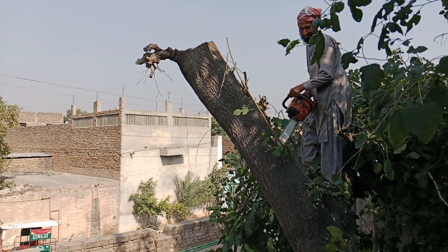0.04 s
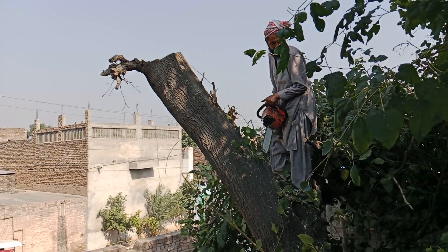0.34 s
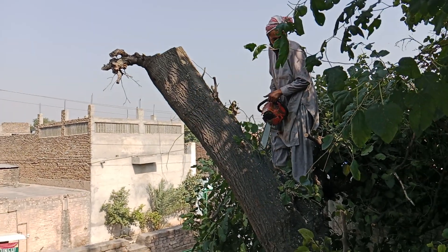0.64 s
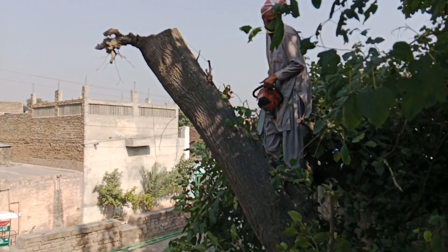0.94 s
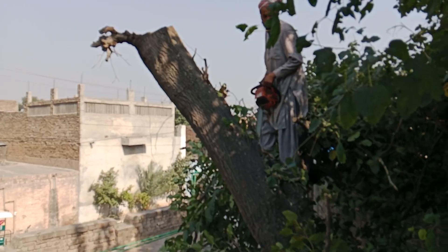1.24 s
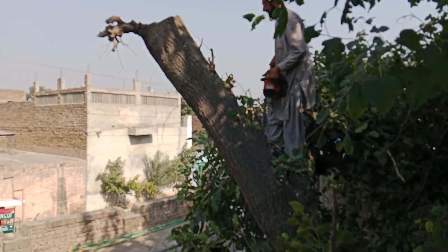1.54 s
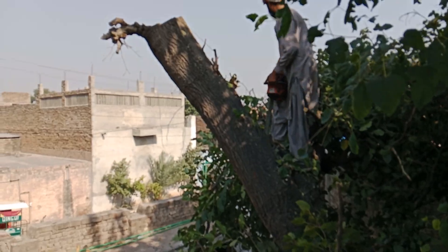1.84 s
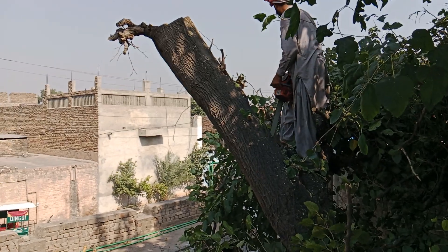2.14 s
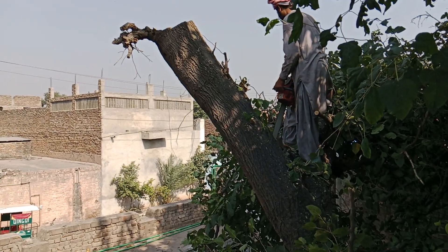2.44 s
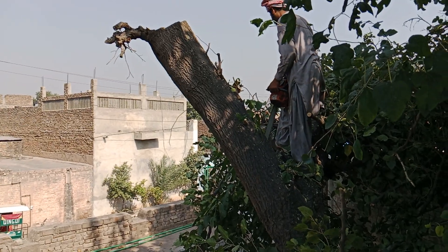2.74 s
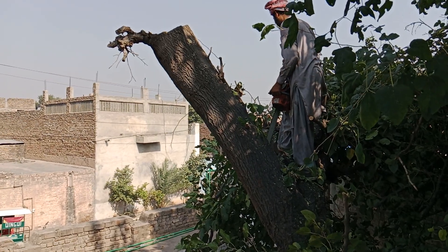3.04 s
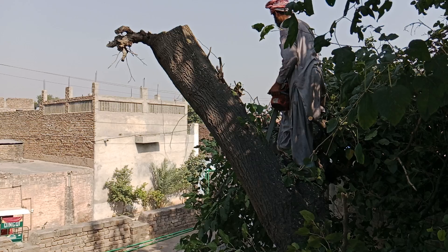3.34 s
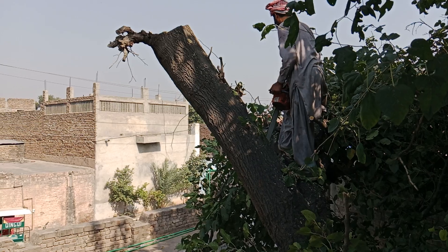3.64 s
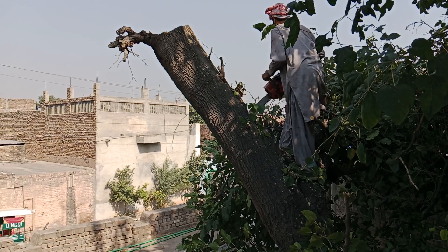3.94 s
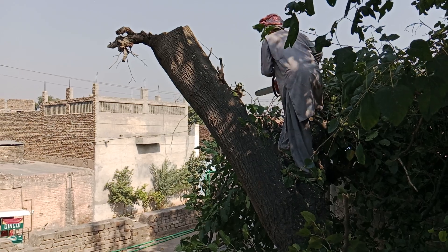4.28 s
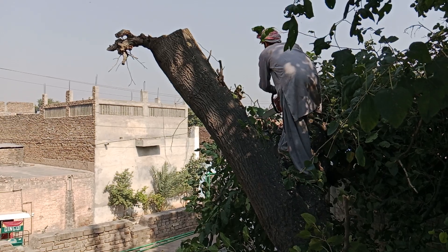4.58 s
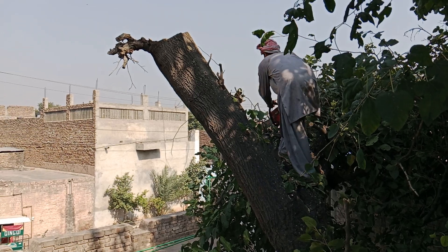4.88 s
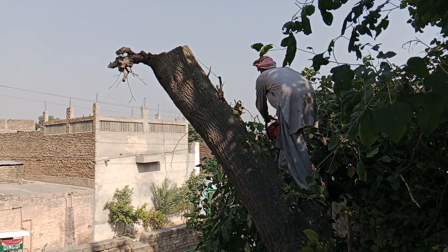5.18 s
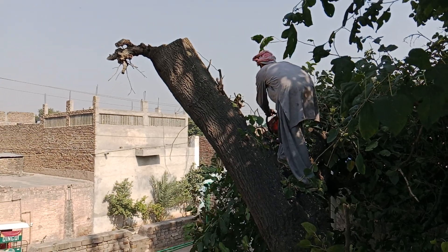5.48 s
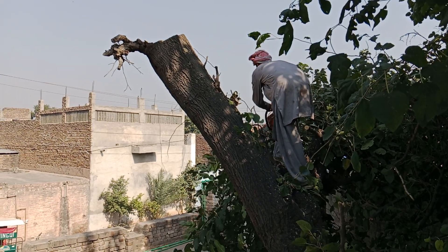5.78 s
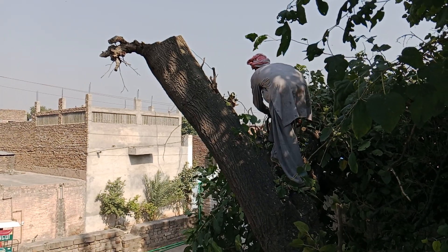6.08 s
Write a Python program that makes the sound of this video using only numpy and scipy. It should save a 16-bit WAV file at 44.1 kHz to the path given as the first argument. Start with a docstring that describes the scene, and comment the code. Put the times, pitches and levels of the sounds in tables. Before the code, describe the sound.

A two-stroke chainsaw is running at high revs outdoors and immediately winds down, its howl, rasp and chain rattle fading as the pitch falls. By about 1.2 seconds it reaches a low, popping idle, with a very faint knock and a few tiny metal tinkles around 1.3 to 1.6 seconds. The idle wavers and misfires, with light metallic ticking underneath. From about 3.2 to 4.2 seconds it grows fuller and throatier, with more short reflection from nearby walls; two faint twig knocks come near 3.7 and 3.9 seconds. At 4.6 seconds the throttle opens and the engine climbs to a loud, booming howl with a sizzling, rattling chain, peaking near 5.1 seconds. The revs sag without reaching idle, jump briefly at 5.5 seconds, sag again, and rise a third time from 6.1 seconds to the end. A faint airy rumble lies beneath.

```python
"""A two-stroke chainsaw winds down from high revs, howling and rattling its chain, in a tree over a walled
yard. It settles to a misfiring idle, swings round, and is blipped three times. Every stroke pops through
the muffler; at speed the pops fuse into a boom and a howl, and an open throttle swells a low drone, a
bark, a sputter and a gas rasp. The chain sizzles on the bar, the piston ticks, the clutch drum rings,
a loose link tinkles, twigs knock, and the walls answer the exhaust."""
import sys
import numpy as np
from scipy import signal
from scipy.fft import rfft, irfft, next_fast_len
from scipy.io import wavfile
from scipy.ndimage import uniform_filter1d, minimum_filter1d, map_coordinates

SR = 44100
rng = np.random.default_rng(int(sys.argv[2]) if len(sys.argv) > 2 else 0)


def digitize_waveform(pressure):
    """Quantize a signal to 16-bit integers and store it at the path in sys.argv[1].

    Rows of a 2-D input are taken as channels; values are limited to [-1, 1].
    """
    field = np.atleast_2d(pressure).T
    bounded = np.clip(field, -1, 1)
    quanta = np.round(bounded * 32767).astype(np.int16)
    wavfile.write(sys.argv[1], SR, quanta)


N = 278345
TIME_S = np.arange(N) / SR


def amp(db):
    """Decibels to gain."""
    return 10 ** (np.asarray(db) / 20)


def curves(rows):
    """An automation curve for each column after the time."""
    times, *columns = np.transpose(rows)
    return [np.interp(TIME_S, times, column) for column in columns]


def along(points, hz):
    """Read (freq_hz, value) points on a log frequency axis."""
    freqs, values = np.transpose(points)
    return np.interp(np.log(hz + 1), np.log(freqs + 1), values)


def steady(x, size=4400):
    """Ride x to a running rms of 1."""
    power = uniform_filter1d(uniform_filter1d(x * x, size), size // 2)
    return x / np.sqrt(np.abs(power) + 1e-20)


def wobble(rate_hz):
    """A smooth random modulator."""
    knots = rng.standard_normal(int(N * rate_hz / SR) + 4)
    return map_coordinates(knots, [np.arange(N) * rate_hz / SR])


def lagged(x, seconds):
    """Follow x with a first-order lag."""
    keep = np.exp(-1 / (seconds * SR))
    return x[0] + signal.lfilter([1 - keep], [1, -keep], x - x[0])


def pulses(times, sizes):
    """Impulses placed between samples."""
    at = np.clip(times * SR, 0, N)
    i = at.astype(int)
    return (np.bincount(i, sizes * (1 - at + i), N + 2) + np.bincount(i + 1, sizes * (at - i), N + 2))[:N]


def gated(turns, start, sharpness, leak):
    """Noise that bursts once a turn and dies away, over a constant leak."""
    return rng.standard_normal(N) * (leak + np.exp(-sharpness * ((turns - start) % 1)))


def colour(x, spectrum, lean=1, size=8192):
    """EQ x; at lean 1 a pulse starts abruptly, at 0 it swells as it fades."""
    cepstrum = irfft(np.log(amp(along(spectrum, np.fft.rfftfreq(size, 1 / SR)))))
    cepstrum[1:size // 2] *= 1 + lean
    cepstrum[size // 2 + 1:] *= 1 - lean
    response = np.fft.fftshift(irfft(np.exp(rfft(cepstrum))))
    return signal.fftconvolve(x, response)[size // 2:][:N]


def ring(x, modes):
    """Play x through damped resonances."""
    t = np.arange(SR // 10) / SR
    body = sum(amp(db) * width * np.exp(-np.pi * width * t) * np.sin(2 * np.pi * hz * t)
               for hz, width, db in modes)
    return signal.fftconvolve(x, body / np.abs(body).max())[:N]


def shimmer(x, depth_db):
    """Narrow bands of x swell and fade at random."""
    bands = signal.stft(x, nperseg=1024)[2]
    field = uniform_filter1d(rng.standard_normal(bands.shape), 3, axis=0)
    field = uniform_filter1d(field, 9, axis=1)
    return signal.istft(bands * amp(depth_db * field / field.std()), nperseg=1024)[1][:N]


def scattered(x, decay_s):
    """Smear x with many tiny, dying reflections."""
    t = np.arange(SR // 40) / SR
    return signal.fftconvolve(x, rng.standard_normal(len(t)) * np.exp(-t / decay_s))[:N]


IDLE_HZ, FREE_HZ = 42, 229.5  # stroke rates: ticking over, and running free at open throttle
# the hunting idle: time_s, stroke_rate_hz
IDLE_SPEED = [(1.15, 46.69), (1.3, 40.51), (1.45, 42.59), (1.87, 38.97), (2.2, 42.9), (2.55, 41.62),
              (2.7, 40.0), (2.87, 42.13), (3.15, 42.18), (3.4, 44.22), (3.55, 43.65), (3.72, 45.86),
              (4.02, 41.91), (4.25, 45.6), (4.52, 46.75)]
# throttle blips: open_s, shut_s, pull_per_s, drag_per_s, opening_fraction
BLIPS = [(4.563, 5.13, 2.36, 1.76, 0.94), (5.549, 5.698, 2.84, 1.181, 0.8),
         (6.077, 6.318, 2.553, 1.2, 0.72)]
def crank(start_hz=147.44, coast_drag_per_s=1.0956):
    """Strokes per second: a coast to idle, then each blip pulls toward free speed and drag takes over."""
    coast = start_hz * np.exp(-coast_drag_per_s * TIME_S)
    speed = np.maximum(coast, curves(IDLE_SPEED)[0])
    for start, shut, pull, drag, _ in BLIPS:
        headroom_hz = FREE_HZ - np.interp(start, TIME_S, speed)
        rise = FREE_HZ - headroom_hz * np.exp(-pull * np.clip(TIME_S - start, 0, shut - start))
        fall = np.exp(-drag * np.maximum(TIME_S - shut, 0))
        speed = np.where(TIME_S > start, rise * fall, speed)
    return uniform_filter1d(speed, 2000)


def gas(attack_s=0.008, release_s=0.054, lead_s=0.0024):
    """Throttle envelope, 0-1: each blip opens just ahead of the crank, holds and releases."""
    t = TIME_S + lead_s
    return sum(opening * (1 - np.exp(-np.maximum(t - start, 0) / attack_s))
               * np.exp(-np.maximum(t - shut, 0) / release_s)
               for start, shut, _, _, opening in BLIPS)


def turned(start_s=3.236, length_s=1):
    """How far the saw has swung round, 0-1."""
    return np.clip((TIME_S - start_s) / length_s, 0, 1)


def loudness(speed, idle_db, speed_db, knee, bend, gas_db, turned_db):
    """A layer's fader, set by a LAW table: its idle level, moved by speed, throttle and facing."""
    revs = np.maximum(speed - IDLE_HZ, 0) / (FREE_HZ - IDLE_HZ)
    # knee: share of the rev range that brings most of the rise; bend: how late the rise sets in
    rise = 1 - np.exp(-(revs / knee) ** bend)
    return amp(idle_db + speed_db * rise + gas_db * gas() + turned_db * turned())


# strokes that fail to fire at idle: time_s
MISFIRES = [1.58, 1.63, 1.88, 2.03, 2.18, 2.22, 2.27, 2.39, 2.46, 2.53, 2.58, 2.65, 2.77, 2.82, 2.87, 2.92,
            2.99, 3.04, 3.11, 3.2, 3.25, 3.34, 3.39, 3.43, 3.5, 3.57, 3.66, 3.7, 3.77, 3.82, 3.88, 3.95,
            4.0, 4.09, 4.14, 4.2, 4.47]
def strokes(speed, turns, coast_end_s=1.511, idle_below_hz=51, misfire_db=-6):
    """Time and burn strength of each stroke; the timing is loosest at idle and from the first blip on."""
    times = np.interp(np.arange(1, turns[-1]), turns, TIME_S)
    rate = np.interp(times, TIME_S, speed)
    burn_dice, timing_dice = rng.standard_normal((len(times), 2)).T
    nearest = lambda s: np.argmin(np.abs(times - s))
    # late in the coast only every third stroke fires
    to_idle = nearest(coast_end_s) - np.arange(len(times))
    misfired = (to_idle > -2) & (to_idle % 3 != 0)
    misfired[[nearest(s) for s in MISFIRES]] = True
    burn_db = np.where(rate < idle_below_hz, 1.73 * burn_dice + misfire_db * misfired, -0.74 * burn_dice)
    jitter_turns = np.where(times > BLIPS[0][0], .011, .004 + .013 * (rate.min() / rate) ** 2)
    return times + jitter_turns * timing_dice / rate, burn_db


# the yard's reverb: freq_hz, t60_s
YARD_DECAY = [(100, .22), (380, .28), (900, .25), (3000, .17), (12000, .1)]
def yard(x, wet_db=-12, turned_db=10):
    """Direct sound plus the walls' short diffuse answer, wetter when the saw faces away."""
    hz, age, bands = signal.stft(rng.standard_normal(SR // 3), SR, nperseg=256)
    decay = amp(-60 * age / along(YARD_DECAY, hz)[:, None])
    tail = signal.istft(bands * decay, SR, nperseg=256)[1]
    tail = np.pad(tail / np.linalg.norm(tail), (SR // 250, 0))  # 4 ms pre-delay
    return x + amp(wet_db + turned_db * turned()) * signal.fftconvolve(x, tail)[:N]


def intake(speed, times, delay_turns=0.3904, airbox_hz=392):
    """The intake gulps between pops, hardest at low revs, and each gulp rings the air box."""
    rate = np.interp(times, TIME_S, speed)
    slowness = np.clip(45 / rate, 0, 1) ** 2
    timing_dice, size_dice = rng.standard_normal((len(times), 2)).T
    gulps = pulses(times + (delay_turns + 0.012 * timing_dice) / rate, slowness * amp(2 * size_dice))
    airbox = signal.lfilter(*signal.iirpeak(airbox_hz, Q=6, fs=SR), gulps)
    return 0.41 * gulps + .8 * airbox


# the whine's sweep through the muffler: pitch_hz, gain_db
WHINE = [(200, -25), (290, 3.5), (400, 3), (490, 6.5), (580, 0.5), (700, -4)]
def overrun_whine(speed, turns):
    """While the revs fall, the port pulses merge into a whine at four times the stroke rate."""
    falling = uniform_filter1d(1. * (np.gradient(speed) < 0), size=2200)
    return 1.62 * amp(along(WHINE, 4 * speed)) * falling * speed / SR * np.cos(8 * np.pi * turns)


# the muffler's tone: freq_hz, gain_db
MUFFLER_EQ = [(40, -45), (80, -31.5), (130, -12), (168, -6), (212, -7.5), (255, 1), (335, 2), (398, 5.5),
              (460, 3.5), (560, 1), (720, -5.5), (830, -18.5), (950, -23), (1090, -46.5), (1300, -51.5),
              (2500, -78)]
# fader ride on the pops, before the throttle ducks them: time_s, level_db
POP_LEVEL = [(0, -23), (.33, -21), (.55, -23), (1, -24.5), (1.5, -25), (1.56, -19.5), (3.1, -19.5),
             (3.45, -18), (4.12, -22), (4.27, -18.5), (4.62, -17), (5.2, -24.5), (5.35, -22), (5.8, -21.5),
             (6.31, -25.5)]
def exhaust(speed, turns, times, burn_db, soft_hz=350, duck_db=-4.5):
    """Each stroke puffs through the muffler and leaves slow eddies; a good burn adds a bang."""
    gulps = intake(speed, times)
    puffs = 0.38 * pulses(times, 1)
    eddies = 0.73 * np.sqrt(speed / SR) * steady(gated(turns, start=0, sharpness=2.1, leak=0))
    pumping = signal.sosfilt(signal.butter(2, soft_hz, fs=SR, output="sos"), puffs + gulps + eddies)
    bangs = pulses(times, amp(0.88 * burn_db))
    pops = colour(pumping + bangs + overrun_whine(speed, turns), MUFFLER_EQ, lean=0.49)
    return amp(curves(POP_LEVEL)[0] + duck_db * gas()) * steady(yard(pops), size=5200)


def harmonics(speed, turns, spectrum, count, wander_rad, waver_db=2.5):
    """Multiples of the stroke rate that swell as they sweep through the resonances."""
    return np.sqrt(2) * sum(amp(along(spectrum, k * speed) + waver_db * wobble(25))
                            * np.cos(2 * np.pi * (k * turns + rng.random()) + wander_rad * wobble(40))
                            for k in range(1, count + 1))


# the pipe's low boom and the howl above it: pitch_hz, gain_db
BOOM_EQ = [(55, -18.5), (88, -7), (142, 1), (160, -0.5), (180, -12.5), (215, -5.5), (262, -10.5),
           (420, -28.5)]
HOWL_EQ = [(300, -28), (500, 1), (700, -12.5), (860, 1), (950, -3.5), (1060, -5.5), (1130, -19.5),
           (1230, -17), (1420, -29), (2000, -31.5)]
BOOM_LAW = dict(idle_db=-59, speed_db=18.5, knee=0.29, bend=3.7, gas_db=19.5, turned_db=2)
HOWL_LAW = dict(idle_db=-61, speed_db=29, knee=0.24, bend=1.0, gas_db=7, turned_db=1)
def pipe(speed, turns):
    """At speed the pops fuse into a boom and a howl."""
    boom = harmonics(speed, turns, BOOM_EQ, count=3, wander_rad=0.42)
    howl = harmonics(speed, turns, HOWL_EQ, count=18, wander_rad=1.0)
    return loudness(speed, **BOOM_LAW) * boom + loudness(speed, **HOWL_LAW) * howl


# the rasp's bite: freq_hz, gain_db
RASP_EQ = [(800, -13), (1220, 8.5), (1370, -1), (1660, 2.5), (1870, 10.5), (2050, 0), (2230, 2),
           (2500, -11), (3140, -6), (3600, -6), (4300, -14), (4850, -31), (7000, -34), (12000, -63)]
RASP_LAW = dict(idle_db=-79, speed_db=42.5, knee=0.34, bend=1.9, gas_db=-7.5, turned_db=3)
def gas_rasp(speed, turns, times, flutter, snort_db=-51):
    """Gas jets and cracks out of the port at each stroke; the intake snorts as air starts to flow."""
    jet = steady(gated(turns, start=0.037, sharpness=0.92, leak=1.0) * amp(1.6 * wobble(120)))
    cracks = steady(scattered(pulses(times, 1), decay_s=0.005))  # rattling round the muffler shell
    crack_gain = .7 * np.clip(speed / IDLE_HZ / 3, 0, 1) ** 2
    rasp = colour((jet + crack_gain * cracks) * flutter, RASP_EQ)
    snort = amp(snort_db) * lagged(gas(), seconds=.04)
    return (loudness(speed, **RASP_LAW) + snort) * steady(shimmer(rasp, depth_db=2.0))


# the rattle's tone: freq_hz, gain_db
RATTLE_EQ = [(900, -18.5), (1230, 5.5), (1450, -2), (1750, 3), (2050, -1), (2230, 2), (2450, -2),
             (2800, -5), (3500, -10.5), (4350, -12), (4850, -25.5), (7000, -29.5), (12000, -43.5)]
# fader ride on the rattle: time_s, level_db
RATTLE_LEVEL = [(0, -42.5), (.29, -47.5), (.38, -75.5), (1, -94), (4.6, -89), (4.78, -45.5), (5.17, -38.5),
                (5.4, -43), (5.6, -42.5), (5.76, -52.5), (5.92, -51.5), (6.08, -50), (6.31, -50.5)]
def chain_rattle(turns, hits_per_s=1500, uneven_db=1.5, shake=0.2):
    """Drive links knock about in the bar groove, hardest around each stroke."""
    count = int(hits_per_s * N / SR)
    times = rng.random(count) * N / SR
    sizes = rng.choice([-1, 1], count) * amp(-uneven_db * rng.standard_normal(count))
    hits = pulses(times, sizes) * (1 + shake * np.cos(2 * np.pi * turns))
    return amp(curves(RATTLE_LEVEL)[0]) * steady(shimmer(colour(hits, RATTLE_EQ), depth_db=6.5))


# the chain's bright hiss: freq_hz, gain_db
HISS_EQ = [(4000, -33.5), (5500, -5.5), (6300, -12.5), (7500, 1.5), (8600, 4), (10500, -4.5), (12000, 1.5),
           (13200, 5), (14500, 0), (16000, -14)]
# links clinking on the bar: pitch_hz, width_hz, gain_db
LINK_MODES = [(1190, 110, -1), (1720, 100, 2.5), (1890, 110, -5), (2690, 66, 5), (4140, 300, -8.5),
              (5000, 110, -9.5), (8700, 210, -10)]
# the sizzle dims after the first blip: time_s, gain_db
SIZZLE_TRIM = [(5.28, 1), (5.4, -7), (5.58, -0.5), (5.7, -11), (5.83, -9.5), (5.95, -10.5), (6.31, -7)]
HISS_LAW = dict(idle_db=-89, speed_db=29, knee=0.17, bend=0.73, gas_db=3, turned_db=2)
LINKS_LAW = dict(idle_db=-93, speed_db=35.5, knee=0.12, bend=1.9, gas_db=0, turned_db=-3.5)
def chain_sizzle(speed, turns, flutter, grit_db=2.5, clink_db=6.0):
    """The chain hisses, flaps and clinks along the bar, trailing the crank through the clutch."""
    chain_speed = lagged(speed, seconds=0.045)
    sliding = gated(turns, start=0.018, sharpness=2, leak=0.76) * amp(grit_db * wobble(380))
    hiss = steady(shimmer(colour(sliding * flutter, HISS_EQ), depth_db=4.5))
    contacts = rng.standard_normal(N) * amp(clink_db * wobble(70))
    clinks = steady(shimmer(ring(contacts, LINK_MODES), depth_db=0.5))
    sizzle = loudness(chain_speed, **HISS_LAW) * hiss + loudness(chain_speed, **LINKS_LAW) * clinks
    return amp(curves(SIZZLE_TRIM)[0]) * sizzle


# the ring of the cylinder and of the clutch drum: pitch_hz, width_hz, gain_db
CYLINDER_MODES = [(2828, 130, -3.5), (3974, 42, -3), (4350, 52, -6.5), (4600, 40, -16.5), (5360, 45, -14),
                  (7940, 25, -11.5)]
CLUTCH_MODES = [(1659, 39, 7.5), (1890, 190, -12.5), (2600, 77, -17)]
# floor under both faders, heard at idle: time_s, tick_db, clutch_db
METAL_FLOOR = [(1.4, -92, -89), (2.3, -72.5, -91), (3.55, -72.5, -88.5), (3.78, -78, -98.5),
               (3.95, -81.5, -68)]
TICK_LAW = dict(idle_db=-95.5, speed_db=48, knee=0.24, bend=1, gas_db=-14.5, turned_db=-15.5)
CLUTCH_LAW = dict(idle_db=-94.5, speed_db=43.5, knee=0.15, bend=1.4, gas_db=3.5, turned_db=-7)
def piston_and_clutch(speed, turns, waver_db=5.0):
    """The piston slaps the cylinder ahead of each pop, and the shaking rings the clutch drum."""
    tick_db, clutch_db = curves(METAL_FLOOR)
    slaps = gated(turns, start=0.76, sharpness=11, leak=.015)
    shaking = gated(turns, start=0.017, sharpness=2.4, leak=0.12)
    ticks = steady(ring(slaps, CYLINDER_MODES))
    drum = steady(ring(shaking, CLUTCH_MODES)) * amp(waver_db * wobble(16))
    return ((amp(tick_db) + loudness(speed, **TICK_LAW)) * ticks
            + (amp(clutch_db) + loudness(speed, **CLUTCH_LAW)) * drum)


# the drone's weight and the bark's midrange: freq_hz, gain_db
DRONE_EQ = [(40, -38.5), (68, -18.5), (90, -7.5), (140, 4.5), (200, -0.5), (260, -2), (340, -12.5),
            (700, -36), (1500, -90.5)]
BARK_EQ = [(100, -21), (260, -3), (390, -9.5), (510, 6.5), (660, -6), (810, 10), (930, -3.5), (1060, -1.5),
           (1160, -9), (1250, -12), (1450, -30), (3000, -56.5)]
DRONE_LAW = dict(idle_db=-41.5, speed_db=-4.5, knee=0.095, bend=1.8, gas_db=12, turned_db=12.5)
BARK_LAW = dict(idle_db=-69.5, speed_db=24.5, knee=0.1, bend=2.2, gas_db=12, turned_db=9.5)
def drone_and_bark(speed, turns, times, burn_db, drone_rough_db=1.6, bark_rough_db=6.0):
    """Heavy gas pulses drone, breaking into chuffs at low revs; the muffler's upper resonance barks."""
    drone_dice, bark_dice = rng.standard_normal((len(times), 2)).T
    pushes = steady(pulses(times, amp(burn_db + drone_rough_db * drone_dice)))
    chuff_gain = 1.3 * (speed.min() / speed) ** 2
    chuffs = chuff_gain * steady(gated(turns, start=0, sharpness=9.2, leak=0.044))
    bangs = pulses(times, amp(burn_db + bark_rough_db * bark_dice))
    drone = steady(yard(colour(chuffs - pushes, DRONE_EQ)))
    bark = steady(yard(colour(bangs, BARK_EQ)))
    return loudness(speed, **DRONE_LAW) * drone + loudness(speed, **BARK_LAW) * bark


# the sputter's throaty tone: freq_hz, gain_db
SPUTTER_EQ = [(80, -28.5), (240, 2), (370, -6), (500, 2.5), (690, 1.5), (810, 4), (930, 1.5), (1050, -9),
              (1230, -15), (1400, -29), (3000, -57.5)]
SPUTTER_LAW = dict(idle_db=-68, speed_db=14.5, knee=0.063, bend=2.6, gas_db=4.5, turned_db=19)
def sputter(speed, turns, uneven_db=6.0, clean_burn_db=-6, gas_boost_db=4.8):
    """Rich mixture leaves the port in ragged bursts; the burn cleans up toward free speed."""
    bursts = gated(turns, start=0, sharpness=1.4, leak=0.25) * amp(uneven_db * wobble(90))
    trim = amp(clean_burn_db * speed / FREE_HZ + gas_boost_db * gas())
    return loudness(speed, **SPUTTER_LAW) * trim * steady(colour(bursts, SPUTTER_EQ))


# the outdoor bed: freq_hz, gain_db
AIR_EQ = [(20, 5.5), (60, -3), (200, -16.5), (1000, -33.5), (3000, -25.5), (7000, -45), (15000, -41.5)]
def outdoor_air(level_db=-65.5):
    """A faint, even rumble and hiss under the saw."""
    return amp(level_db) * steady(colour(rng.standard_normal(N), AIR_EQ))


def taps(events, modes, decay_s):
    """Small dry contacts: snaps of noise that ring a body."""
    snaps = sum(amp(db) * (TIME_S > s) * np.exp(-np.abs(TIME_S - s) / decay_s) for s, db in events)
    return ring(snaps * rng.standard_normal(N), modes)


# the loose link's hits: start_s, strength_db
TINKLES = [(1.294, -86), (1.438, -76.5), (1.509, -80), (1.556, -80.5), (1.604, -76)]
# its ring: pitch_hz, width_hz, gain_db
LOOSE_LINK_MODES = [(3080, 83, -10.5), (5520, 58, -5)]
def loose_link():
    """A loose link tinkles as the saw settles to idle."""
    return taps(TINKLES, LOOSE_LINK_MODES, decay_s=.0006)


# twig and handle knocks: start_s, strength_db
KNOCKS = [(1.3662, -70), (3.679, -69), (3.8571, -75)]
# their dry ring: pitch_hz, width_hz, gain_db
TWIG_MODES = [(1210, 81, 8), (2820, 440, -10), (4400, 310, -11.5), (8900, 320, -13.5)]
def twig_knocks():
    """Light knocks on twigs and handle ring briefly."""
    return taps(KNOCKS, TWIG_MODES, decay_s=0.018)


def scene():
    """One crankshaft drives every part of the saw, over faint outdoor air."""
    speed = crank()
    turns = np.cumsum(speed) / SR
    times, burn_db = strokes(speed, turns)
    engine = exhaust(speed, turns, times, burn_db)
    engine += drone_and_bark(speed, turns, times, burn_db) + sputter(speed, turns)
    flutter = amp(3.0 * wobble(35))  # rasp and chain hiss flicker together
    rasp = gas_rasp(speed, turns, times, flutter)
    metal = chain_sizzle(speed, turns, flutter) + chain_rattle(turns) + piston_and_clutch(speed, turns)
    background = outdoor_air() + twig_knocks() + loose_link()
    return (engine + pipe(speed, turns) + rasp + metal + background)[None]


def record(dry):
    """A limiter holds down the loudest pops, and a steep low-pass cuts the very top."""
    ceiling, top_hz = .48, 15700
    gain = minimum_filter1d(ceiling / np.maximum(np.abs(dry), ceiling), size=600)
    gain = uniform_filter1d(uniform_filter1d(gain, size=300), size=300)
    size = next_fast_len(N + SR // 4)
    passband = np.fft.rfftfreq(size, 1 / SR) < top_hz
    return irfft(rfft(dry * gain, size) * passband, size)[..., :N]


dry = scene()
out = record(dry)
digitize_waveform(out)
```